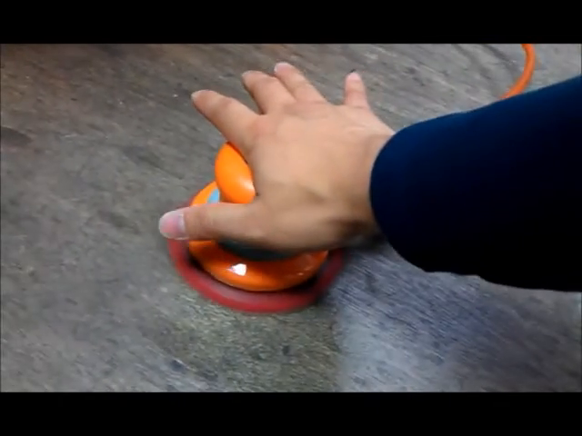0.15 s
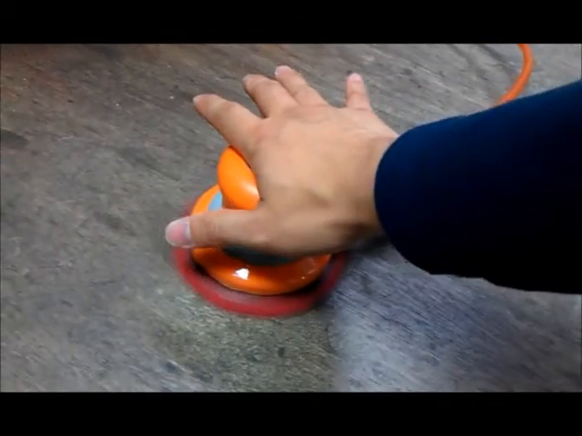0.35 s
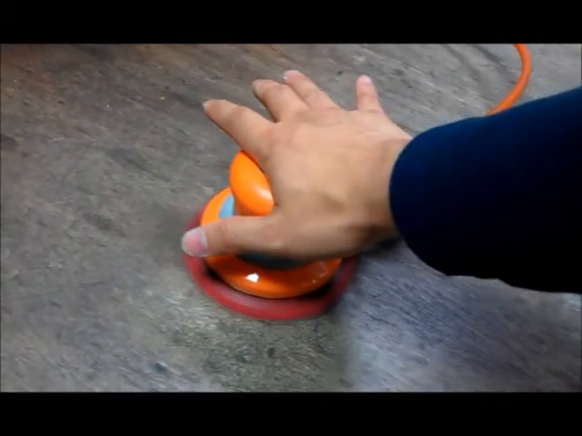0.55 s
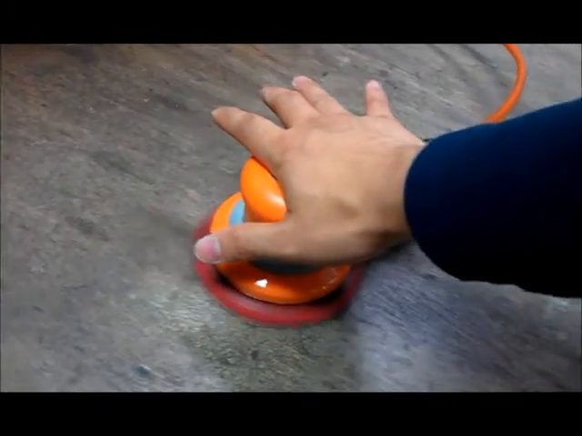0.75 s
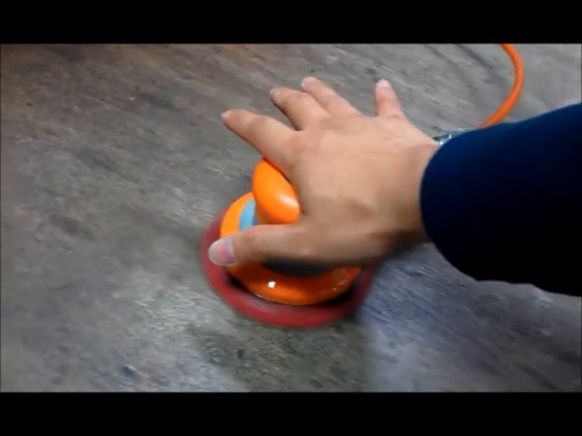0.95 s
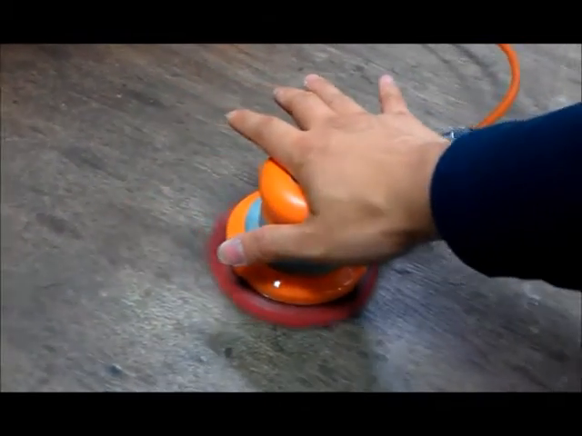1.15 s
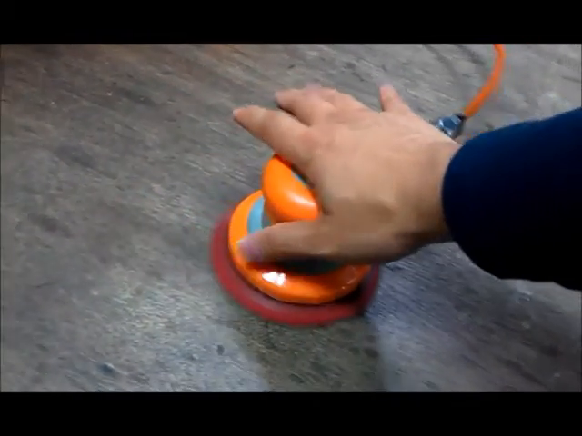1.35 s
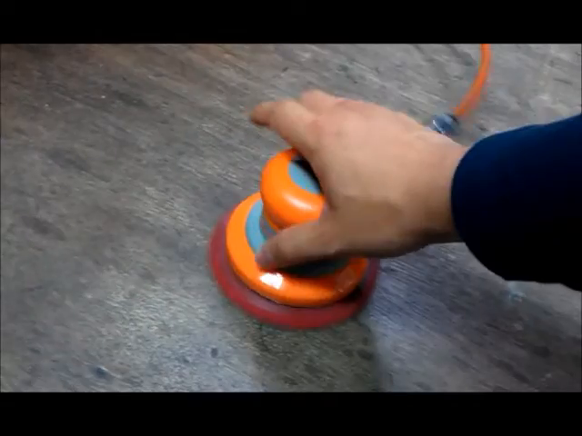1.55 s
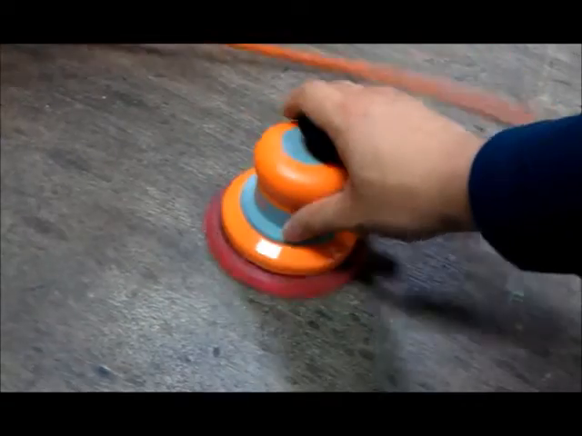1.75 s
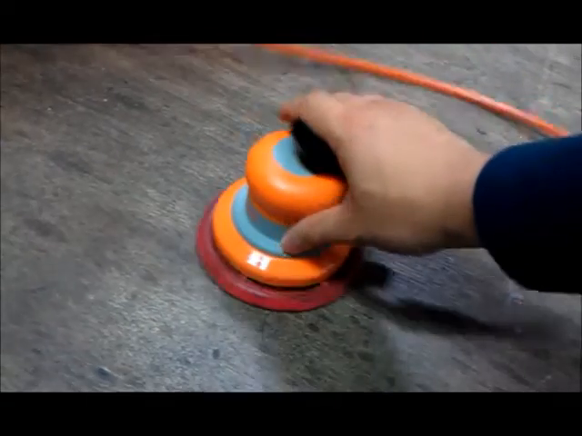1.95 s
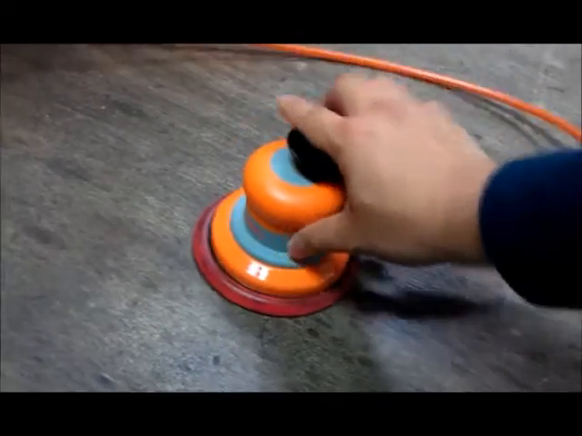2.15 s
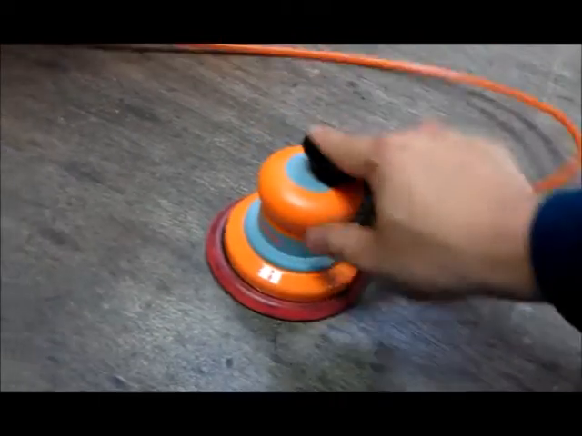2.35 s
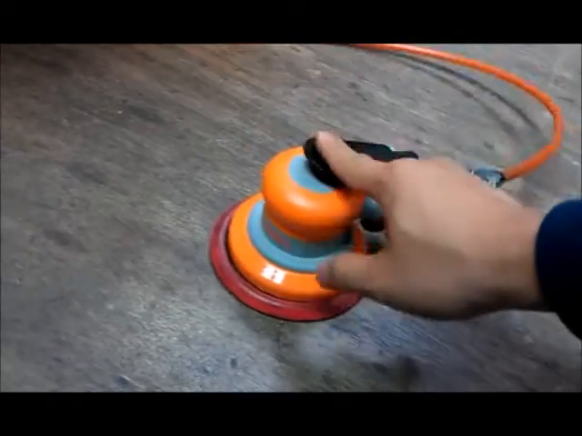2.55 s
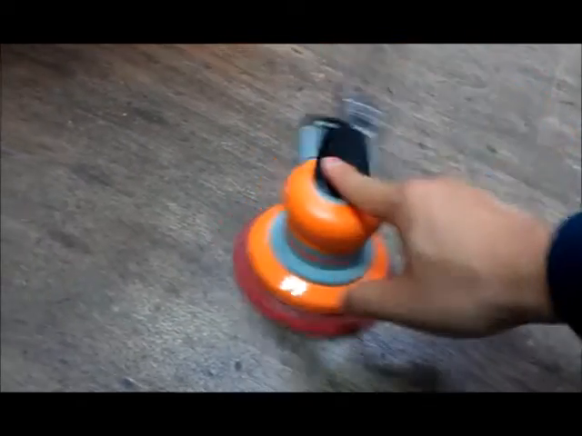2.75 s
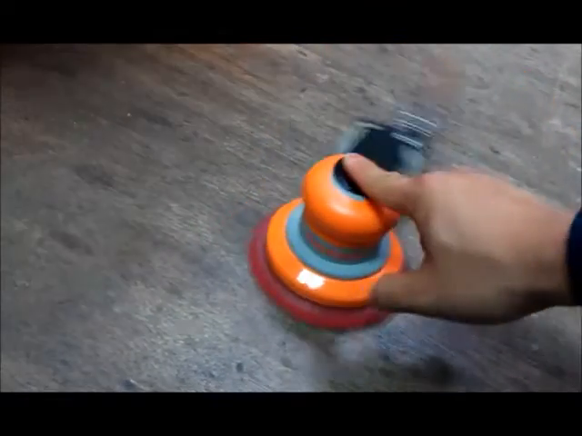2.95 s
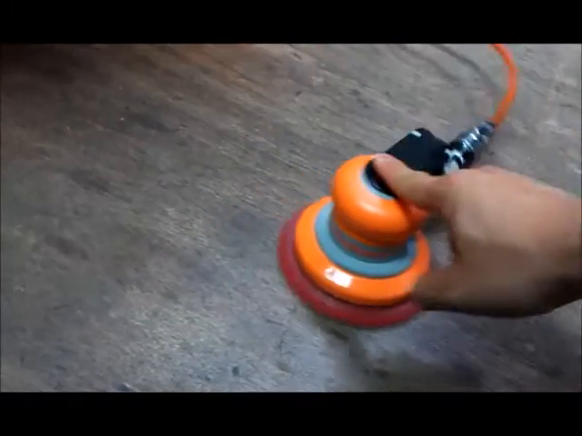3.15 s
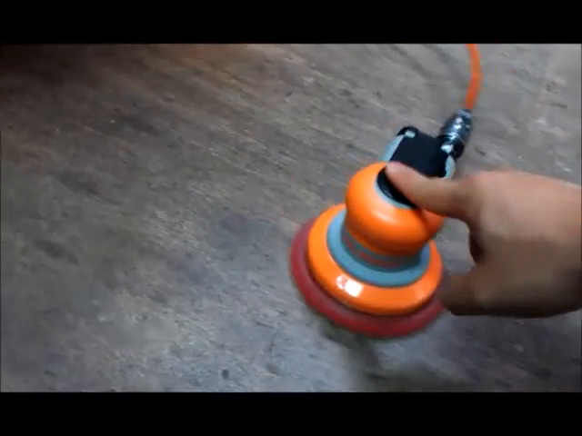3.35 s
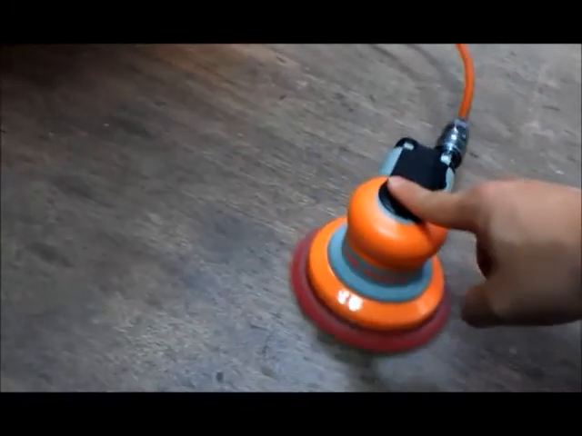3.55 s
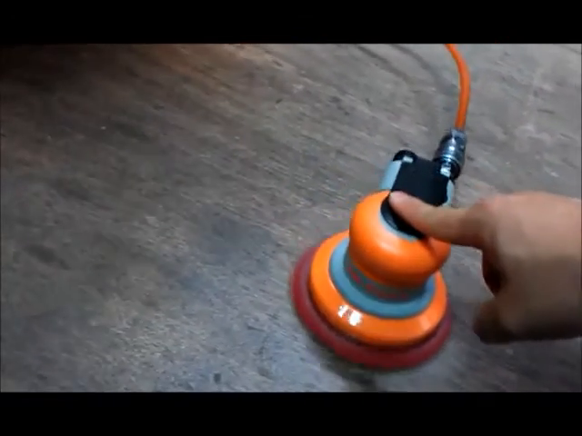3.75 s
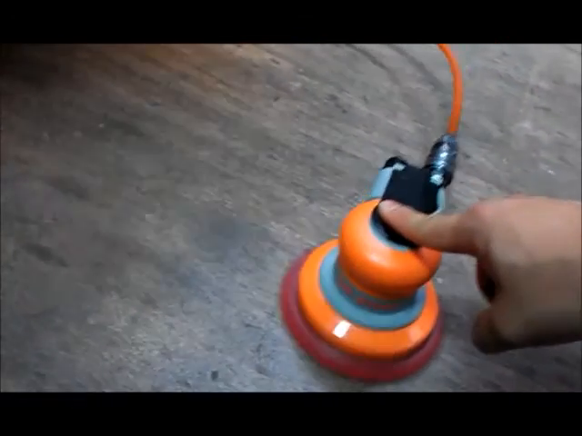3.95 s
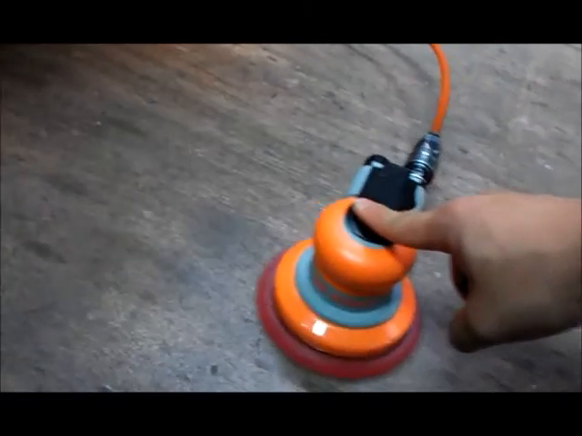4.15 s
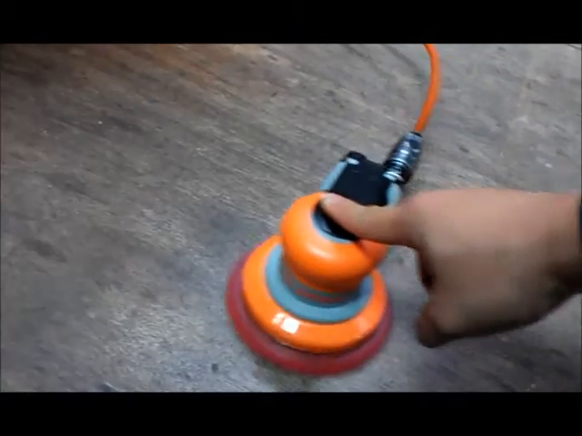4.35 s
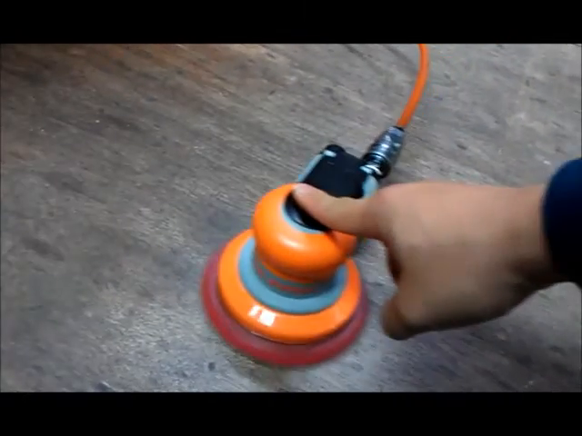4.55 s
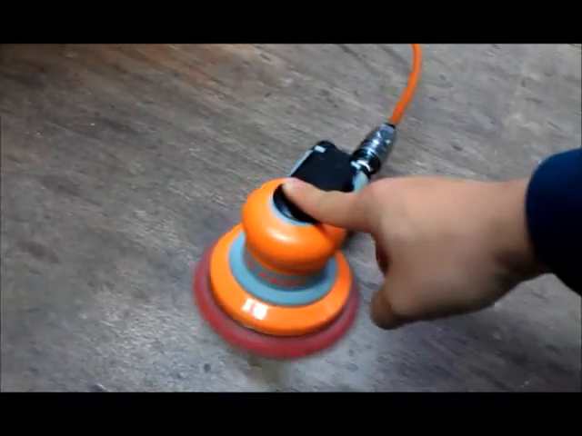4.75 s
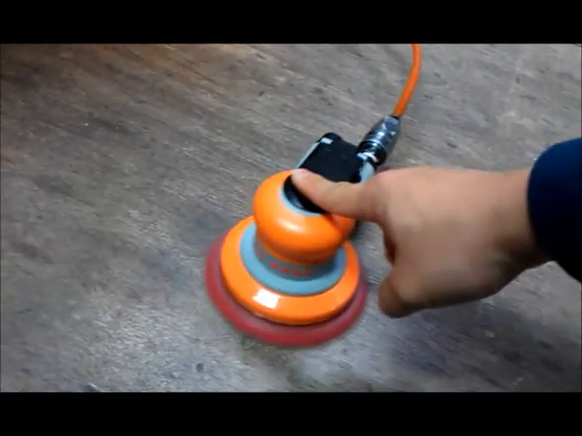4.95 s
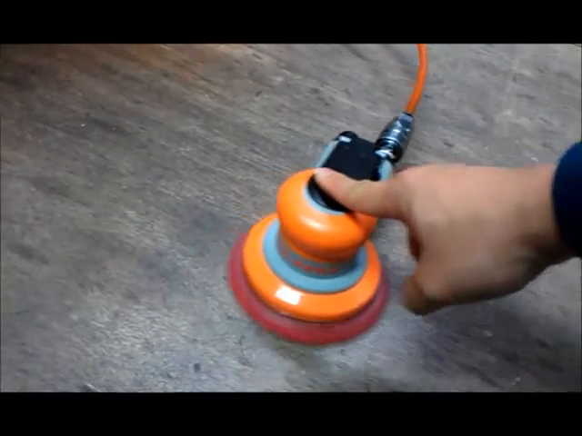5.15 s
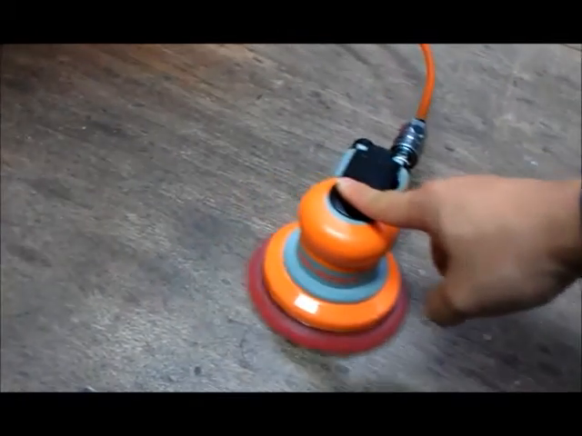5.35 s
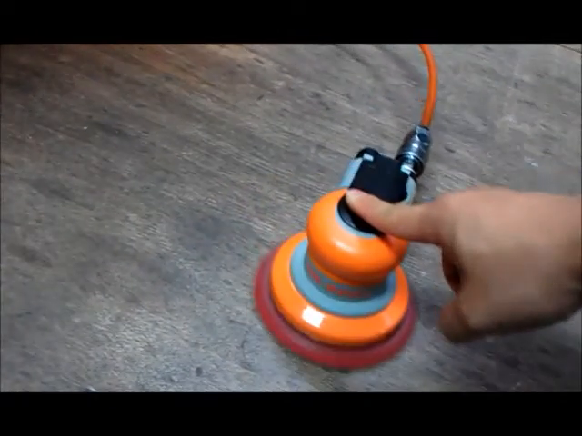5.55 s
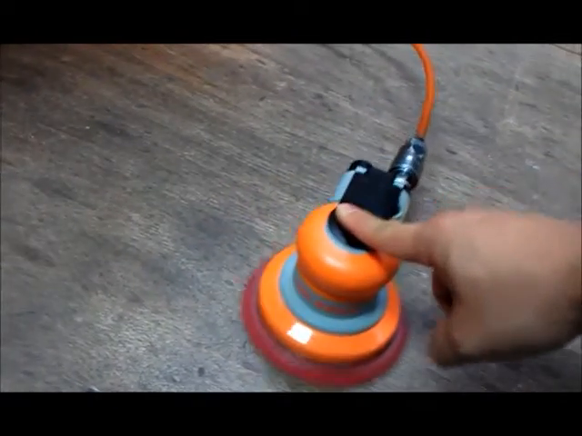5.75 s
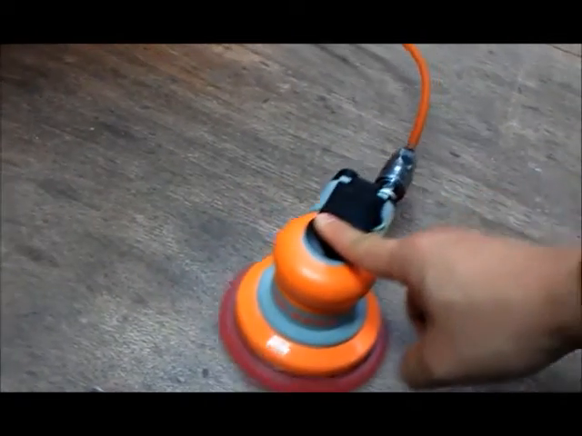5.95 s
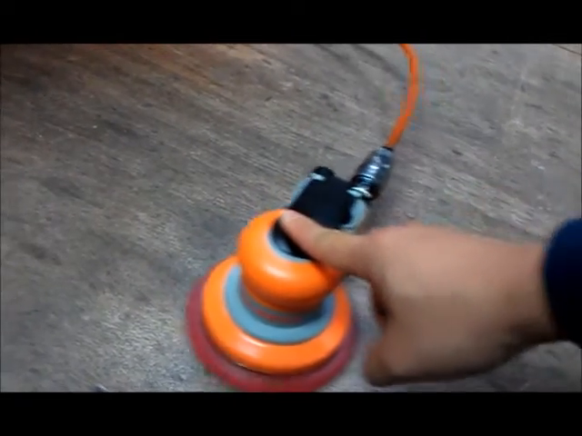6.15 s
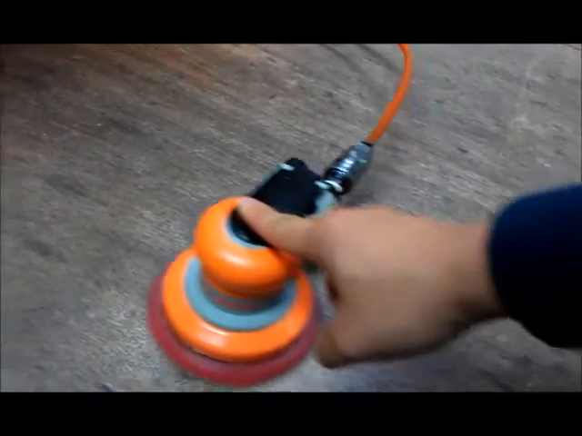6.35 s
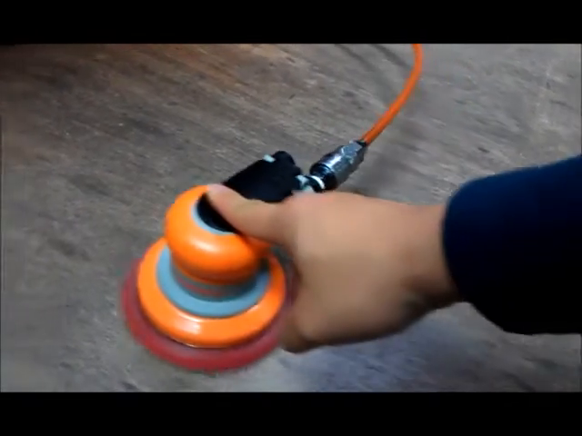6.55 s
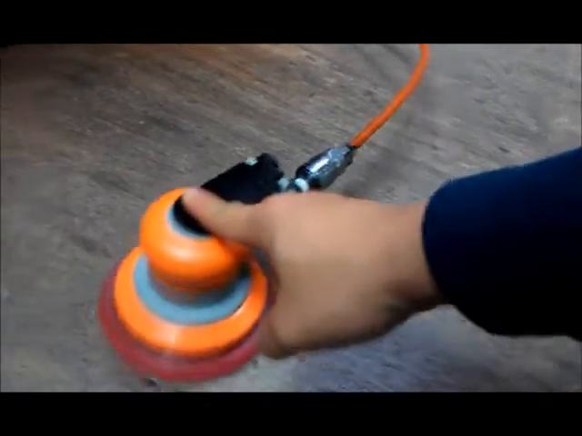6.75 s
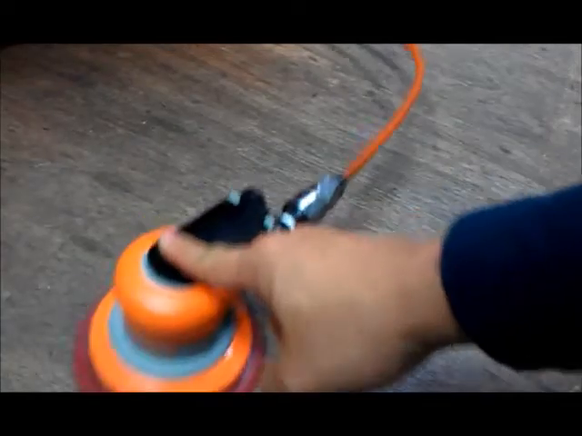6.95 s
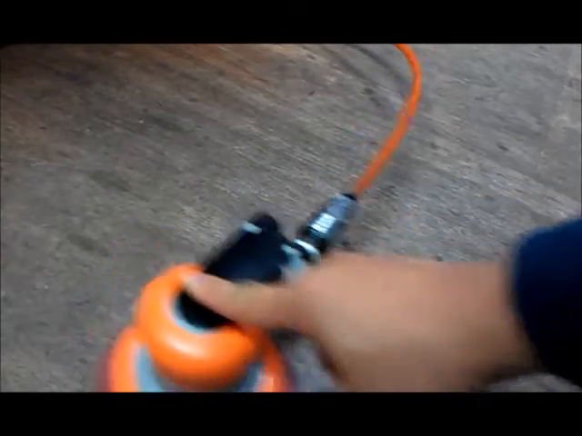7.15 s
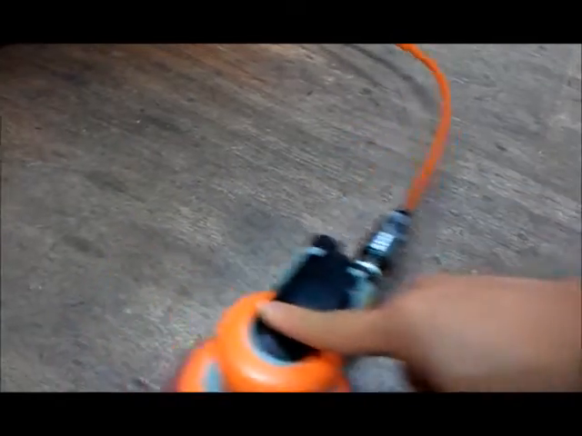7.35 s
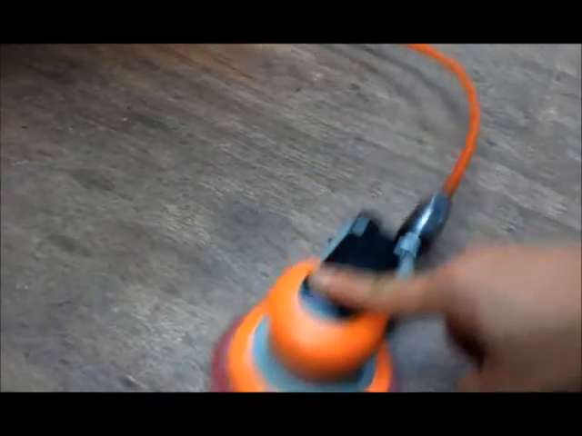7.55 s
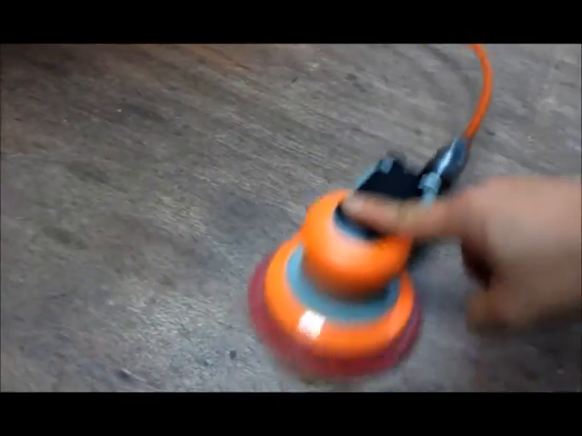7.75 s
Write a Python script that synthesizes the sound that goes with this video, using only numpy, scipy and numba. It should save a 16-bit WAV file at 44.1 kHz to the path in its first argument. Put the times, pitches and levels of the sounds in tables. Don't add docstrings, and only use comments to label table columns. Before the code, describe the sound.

From 0 to 1.6 s an air-driven orbital sander runs at full speed very close: a steady raspy buzz around 160 Hz with a strong vane tone near 800 Hz, thin high whine around 6 kHz, metallic clatter, broad bright exhaust hiss and gritty scrubbing on concrete. At 1.6 s it is let go; the air cuts quickly and the pitch slides down in a puffing, fading growl over about 0.4 s, with small pad scuffs between 1.85 and 2.05 s. Faint workshop hum and dull low rumble fill the lull. Around 2.65 s come a soft lever knock and light clicks, strongest near 2.75 and 2.82 s, as the rotor spins up rapidly. From about 2.9 s to 7.8 s the full buzz and hiss continue, pitch almost constant, timbre shifting subtly as the tool turns. Short dull room reflections, almost identical left and right.

```python
import sys
import numpy as np
from scipy import signal
from scipy.fft import rfft, irfft, next_fast_len
from scipy.io import wavfile
from scipy.ndimage import uniform_filter1d
from numba import njit

SR = 44100
rng = np.random.default_rng(int(sys.argv[2]) if len(sys.argv) > 2 else 0)


def dump(signal):
    limited = np.clip(np.atleast_2d(signal).T, -1, 1)
    pcm = np.round(limited * 32767).astype(np.int16)
    wavfile.write(sys.argv[1], SR, pcm)


def nominal_scale(level):
    x = np.asarray(level, float) / 20
    return 10 ** x


N = 343539
T = np.arange(N) / SR
STEP = 64
SLOW_COUNT = N // STEP + 2
VANES = 5
FULL_HZ = 160


def colour(table, hz):
    f_hz, db = np.transpose(table)
    return np.interp(np.log(np.maximum(hz, 1)), np.log(f_hz), db)


def curve(table):
    s, *cols = np.transpose(np.vstack(table))
    return [np.interp(T, s, c) for c in cols]


def unit(x):
    return x / np.sqrt(np.mean(np.abs(x) ** 2))


def walk(rate_hz, count=1, size=SLOW_COUNT):
    k = max(int(SR / STEP / rate_hz), 1)
    kernel_rows = rng.standard_normal((count, size))
    for _ in range(2):
        kernel_rows = uniform_filter1d(kernel_rows, k)
    return unit(kernel_rows)


def upsample(slow):
    return np.interp(np.arange(N) / STEP, np.arange(len(slow)), slow)


def turbulence(table, flicker_db, tilt_db=0):
    size = next_fast_len(N)
    hz = np.arange(size // 2 + 1) * SR / size
    spec = rfft(rng.standard_normal(size)) * nominal_scale(colour(table, hz))
    centres_oct = np.arange(np.log2(table[0][0]), np.log2(table[-1][0]) + .4, 1 / 3)
    swells = walk(5.1, len(centres_oct)) + 0.84 * walk(20, len(centres_oct))
    out = 0
    for c, swell in zip(centres_oct, swells):
        share = np.clip(1 - 3 * np.abs(np.log2(hz + 1) - c), 0, 1)
        top = np.clip(c - np.log2(5600), 0, 1)
        gain = upsample(nominal_scale(flicker_db * swell))
        out = out + irfft(spec * share, size)[:N] * gain * nominal_scale(top * tilt_db)
    return out


# mid t/s, half length/s, shaft multiple, change/dB
SINGS = [(.4, .7, 36, 9), (4.65, .2, 36, 11), (6.15, .4, 36, 6), (.3, .7, 38, -9), (3.85, .3, 38, 8),
         (5.25, .3, 38, 10), (7.6, .4, 38, 6), (4.1, .8, 40, 9), (5.7, .3, 40, 11), (7, .2, 40, 7),
         (7.65, .25, 40, 10), (1.45, .25, 15, -9), (3.05, .2, 15, -7), (6.45, .45, 15, -14),
         (5, 1.3, 20, 7), (7.2, .6, 20, -9), (7.4, .4, 15, -4), (1.15, .3, 21, 5), (6.05, .4, 21, 5),
         (.9, .5, 19, 5), (5.7, .3, 19, 4), (7.3, .6, 19, -7), (.5, .5, 28, 8), (.2, .4, 32, 9),
         (4.2, .3, 32, 7), (3.9, .5, 75, 5), (5.5, .4, 75, 4), (7, .9, 75, -8), (.5, .5, 75, -7),
         (4.6, 1.5, 80, 6)]


def sing_db(multiple, t):
    return sum(db * np.exp(-((t - s) / half) ** 4) for s, half, k, db in SINGS if k == multiple)


# t/s, shaft f/Hz, vane tone level/dB, second level/dB
RUN = [
    [(0, 159.6, -32, -39), (.5, 159.9, -34, -38), (.85, 159.5, -37, -40), (1.27, 160.2, -35, -39),
     (1.58, 159.7, -35, -40)],
    [(3, 159.6, -35, -37), (3.27, 158.7, -34, -35), (3.76, 159.3, -34, -34), (4.3, 159.9, -36, -38),
     (4.74, 160.5, -36, -44), (5.4, 160.2, -35, -36), (5.72, 160.7, -37, -37), (6.1, 161.0, -39, -41),
     (6.6, 160.8, -35, -40), (7, 160.6, -32, -46), (7.2, 160.7, -34, -46), (7.42, 160.5, -37, -36),
     (7.79, 160.7, -37, -35)],
]
WHINES = (36, 38, 40)


def tones(speed):
    third_db, whine_db = -43, -47
    full_hz, vane_db, second_db = curve(RUN)
    shaft_hz = full_hz * speed * (1 + .0008 * upsample(walk(6)[0]))
    free = np.clip((1 - speed) / .04, 0, 1)
    puffs = puffs_db(shaft_hz)
    vanes = [db + free * (puff - db) for db, puff in zip((vane_db, second_db, third_db), puffs)]
    return shaft_hz, vanes + [whine_db - 30 * free] * len(WHINES)


@njit
def multiples(turn, gain, step):
    out = np.zeros(len(turn))
    for i in range(len(turn)):
        j, w, z, total = i // step, np.exp(1j * turn[i]), 1. + 0j, 0.
        u = (i - j * step) / step
        for k in range(gain.shape[1]):
            z *= w
            total += (z * (gain[j, k] + u * (gain[j + 1, k] - gain[j, k]))).imag
        out[i] = total
    return out


# f/Hz, level/dB
HOUSING = [(300, -42), (500, -29.5), (1000, -20), (1400, -25), (2100, -31.5), (2600, -25.5), (3400, -18.5),
           (4100, -25.5), (4900, -30.5), (5700, -14.5), (6400, -21), (7300, -24), (9000, -43), (12400, -57),
           (15500, -8)]


def rotor(shaft_hz, turn, line_db, hiss_db):
    clatter_db, unbalance_db, vane_boost_db = -1.5, -39.5, 8
    slow = np.minimum(np.arange(SLOW_COUNT) * STEP, N - 1)
    order = np.arange(1, 96)[:, None]
    on_vane = order % VANES == 0
    slack_db = 20 * np.log10(shaft_hz[slow] / FULL_HZ)
    db = colour(HOUSING, order * shaft_hz[slow]) + hiss_db[slow] + clatter_db + 4.4 * slack_db
    db = db + vane_boost_db * on_vane * np.clip((order - 35) / 30, .1, 1)
    db = db + 0.64 * rng.standard_normal(order.shape) + 2.0 * walk(2.5, len(order))
    waver = np.clip(order / 200, .2, .4) * (walk(20, len(order)) + 1j * walk(20, len(order)))
    db[0] = unbalance_db + 6.8 * slack_db
    for k, level_db in zip((VANES, 2 * VANES, 3 * VANES, *WHINES), line_db):
        db[k - 1] = level_db[slow] + 0.37 * (k in WHINES)
        waver[k - 1] *= .7
    for k in (4, 5, 6):
        over_hz = np.maximum(k * VANES * shaft_hz[slow] - 1300, 0)
        chuff_db = db[3 * VANES - 1] - 5.7 * (k - 3) - over_hz / 60
        db[k * VANES - 1] = np.maximum(db[k * VANES - 1], chuff_db)
    db = db - 8 * (order > 86) * ~on_vane
    waver[0] *= .2
    db = db + np.array([sing_db(k, T[slow]) + 0 * slow for k in order[:, 0]])
    steady = [int(k) - 1 for k, _ in BEARING if k == int(k)]
    db[steady] -= 30 * (shaft_hz[slow] > 150)
    phase = np.exp(2j * np.pi * rng.random(order.shape))
    gain = np.sqrt(2) * nominal_scale(db) * (1 + waver) * phase
    return multiples(turn, np.ascontiguousarray(gain.T), STEP)


# shaft multiple, level/dB
BEARING = [(1.5, -64), (3, -60), (5.83, -51), (6, -46), (6.66, -47), (6.87, -48), (7, -47), (7.37, -51),
           (8.58, -51), (9.1, -43), (13.65, -56), (20, -47), (20.9, -50), (21, -46), (22, -47),
           (22.75, -51), (28, -48), (28.9, -52), (31.8, -51), (35, -45), (60, -54), (65, -52), (75, -49),
           (77, -56), (80, -55), (85, -52), (90, -51), (93, -58), (95, -58)]


def bearing(shaft_hz, turn):
    out = 0
    for ratio, db in BEARING:
        drift, swell = (upsample(w) for w in walk(1.83, 2))
        gain = np.sqrt(2) * nominal_scale(db + 2.5 * swell + sing_db(ratio, T))
        out = out + gain * np.sin(ratio * turn + .5 * drift) * (shaft_hz / FULL_HZ) ** 12
    return out


# t/s, air level/dB, exhaust turned to phone/dB, pad pressure/dB
GRIP = [(0, -25, 1.5, 0.5), (.15, -26, 3.5, 0.5), (1.2, -27, 4, -0.5), (1.55, -26.5, -0.5, -2),
        (2.85, -25, 2, 1.5), (3.15, -27, 4, 1), (3.8, -25.5, 3, 0), (4.6, -26.5, 1.5, -2.5),
        (5.6, -26, 2, -0.5), (6.7, -27, 2, -2), (7.1, -26.5, 1.5, 2), (7.79, -24, 1.5, -5)]


def grip():
    return curve(GRIP)


def air_flow_db(valve, speed, air_db):
    bleed = np.minimum(nominal_scale(4) * speed ** 1.31, 1)
    return air_db + 20 * np.log10(np.maximum(valve ** 1.6, bleed))


# f/Hz, level/dB per Hz
HISS = [(880, -32), (1500, 1), (1640, -3.5), (1700, -5), (1950, -2.5), (2220, -12), (2490, -0.5),
        (2890, -2.5), (3280, 1), (4190, -1.5), (4490, -0.5), (6190, 2.5), (8980, -5.5), (10500, -7),
        (15500, -15)]


def hiss(valve, speed, turn, hiss_db, top_db):
    dull_db = -2 * (1 - valve) * speed
    air = unit(turbulence(HISS, 0.87, top_db + dull_db)) * nominal_scale(hiss_db - 0.98)
    return air * (1 + .04 * np.sin(turn) + .04 * np.sin(turn / 2) + .03 * np.sin(2 * turn))


# f/Hz, level/dB per Hz
SCRUB = [(100, -42), (170, -14), (191, -18), (211, -14), (427, -13.5), (621, -1), (738, 2), (804, -2.5),
         (866, 2), (1080, 8), (1210, 5.5), (1430, 3), (1650, -33), (1700, -11), (2200, -2.5), (2860, -43),
         (4840, -120)]


def scrub(shaft_hz, speed, turn, press_db):
    whirl_db = 8.5 * np.exp(-((shaft_hz - 91.5) / 39) ** 2)
    chatter_db = 1.5 * upsample(walk(25)[0])
    level_db = -34 + press_db + 0.74 * 20 * np.log10(speed) + whirl_db + chatter_db
    throb = 1 + 0.076 * np.sin(turn) + 0.069 * np.sin(turn / 2)
    return unit(turbulence(SCRUB, 0.61)) * nominal_scale(level_db - 2.5) * throb


def room(x):
    t60_s, level_db = .4, -19
    t = T[:SR // 2]
    tail = rng.standard_normal(len(t)) * np.exp(-np.log(1000) * t / t60_s) * (t > .006)
    tail = signal.sosfilt(signal.butter(2, [500, 6000], "bp", fs=SR, output="sos"), tail)
    return nominal_scale(level_db) * signal.fftconvolve(x, tail / np.sqrt(np.sum(tail ** 2)))[:N]


def slab():
    return unit(turbulence([(25, -22), (60, -7), (110, -2), (200, -12)], 4.5)) * nominal_scale(-68)


# f/Hz, level/dB per Hz
SHOP = [(15, -39), (25, -32), (70, -14.5), (169, -2.5), (193, -8), (215, -3), (267, -11), (314, -0.5),
        (445, -6), (685, -5.5), (3440, -15.5), (10100, -21.5), (15500, -23)]


def shop():
    return unit(turbulence(SHOP, 0.62)) * nominal_scale(-52)


def lever():
    let_go_s, shut_s, coast_s = 1.612, .03, .14
    press_s, open_s, lag_s = 2.65, .11, .042

    def lagged(t):
        return t - lag_s * (1 - np.exp(-t / lag_s))

    since = np.maximum(T - press_s, 0)
    rise = (lagged(since) - lagged(np.maximum(since - open_s, 0))) / open_s
    after = np.maximum(T - let_go_s, 0)
    valve = np.maximum(np.exp(-after / shut_s), np.minimum(since / open_s, 1))
    return valve, np.maximum(np.exp(-after / coast_s), rise)


# f/Hz, width/Hz, level/dB
PORT = [(404, 55, -9.5), (640, 320, -1.5), (1120, 240, 2), (1690, 250, -0.5)]


def port_db(hz):
    modes = (nominal_scale(db) / (1 + 1j * (hz - f_hz ** 2 / hz) / width_hz) for f_hz, width_hz, db in PORT)
    return 20 * np.log10(np.abs(sum(modes)))


# t/s, puff level/dB, step to each overtone/dB
PUFFS = [
    [(1.6, -47, -3), (1.63, -17, -2), (1.65, -18, -4), (1.678, -30, 5), (1.692, -33, 3),
     (1.722, -24.5, -3.5), (1.745, -37.5, 3), (1.86, -45.5, -3.5), (2.05, -74, 9)],
    [(2.64, -83, -5), (2.7, -36, -3), (2.74, -28.5, -16), (2.758, -35, -9), (2.785, -25, -4),
     (2.81, -28, -7), (2.86, -28.5, -10), (2.9, -17, -5)],
]


def puffs_db(shaft_hz):
    puff_db, step_db = curve(PUFFS)
    return [puff_db + k * step_db + port_db((k + 1) * VANES * shaft_hz) for k in range(3)]


# t/s, peak level/dB, body ring re peak/dB, t60/s
SCUFFS = [(1.853, -28.5, -5, 0.09), (1.897, -32, -14, .07), (1.955, -36, -9, 0.1), (2.035, -38, -8, 0.08),
          (2.64, -40, -4, 0.1), (2.695, -41, 15, 0.033), (2.746, -13, -18, 0.027), (2.813, -21.5, 9, 0.021),
          (2.82, -8, -8, .016)]


def scuffs():
    out, t = np.zeros(N), T[:SR // 8]
    grit_band = signal.butter(2, [2900, 8500], "bp", fs=SR, output="sos")
    for s, db, ring_db, t60_s in SCUFFS:
        grit = signal.sosfilt(grit_band, rng.standard_normal(len(t)))
        ring = nominal_scale(ring_db) * np.sin(2 * np.pi * 1130 * t)
        fade = (1 - np.exp(-t / (0.046 * t60_s))) * np.exp(-np.log(1000) * t / max(t60_s, .005))
        out[int(s * SR):int(s * SR) + len(t)] += nominal_scale(db) * (grit + ring) * fade
    return out


def thud():
    start_s, level_db, f_hz, t60_s = 2.668, -43, 210, .07
    t = np.maximum(T - start_s, 0)
    return nominal_scale(level_db) * np.sin(2 * np.pi * f_hz * t) * np.exp(-np.log(1000) * t / t60_s)


def scene():
    valve, speed = lever()
    shaft_hz, line_db = tones(speed)
    air_db, top_db, press_db = grip()
    hiss_db = air_flow_db(valve, speed, air_db)
    turn = 2 * np.pi * np.cumsum(shaft_hz) / SR
    near = rotor(shaft_hz, turn, line_db, hiss_db) + bearing(shaft_hz, turn)
    near = near + hiss(valve, speed, turn, hiss_db, top_db) + scrub(shaft_hz, speed, turn, press_db)
    near = near + scuffs() + thud()
    mid = near + room(near) + slab() + shop()
    return np.array([mid, mid])


def side_grain(mid):
    low_hz, high_hz, width_hz = 4100, 13800, 1500
    side, size = np.zeros(N), int(.046 * SR)
    hz = np.arange(size // 2 + 1) * SR / size
    window = np.sin(np.pi * np.arange(size) / size)
    starts_s = np.arange(.2, N / SR - .2, .24)
    for start_s, (late, place, wide) in zip(starts_s, rng.random((len(starts_s), 3))):
        at = int((start_s + .15 * late) * SR) - size // 2
        from_hz = low_hz + place * (high_hz - low_hz)
        to_hz = from_hz + width_hz * (.7 + .6 * wide)
        other = rfft(mid[at - size:at]) * (hz > from_hz) * (hz < to_hz)
        side[at:at + size] += nominal_scale(-5) * irfft(other, size) * window
    return side


def band_limit(x):
    return signal.sosfilt(signal.butter(12, 15680, fs=SR, output="sos"), x)


def record(dry):
    dry = signal.sosfilt(signal.ellip(8, .3, 60, 15660, fs=SR, output="sos"), dry)
    side = side_grain(dry[0])
    return band_limit(dry + np.array([side, -side]))


dry = scene()
out = record(dry)
dump(out)
```